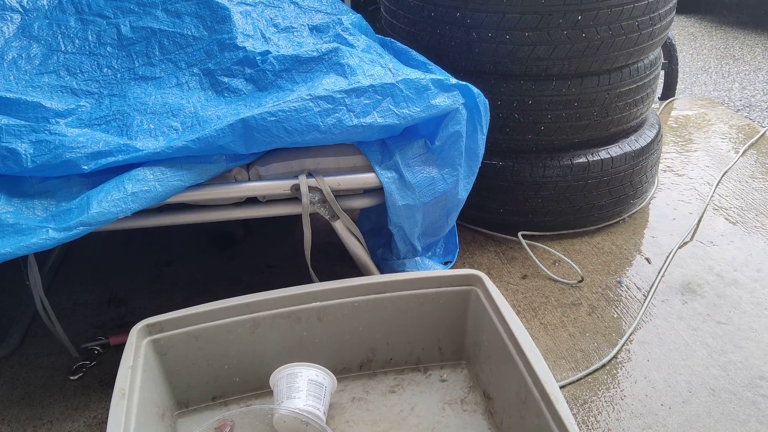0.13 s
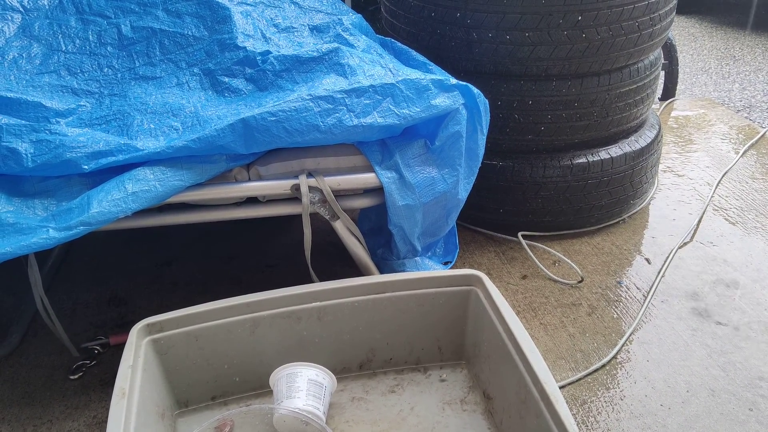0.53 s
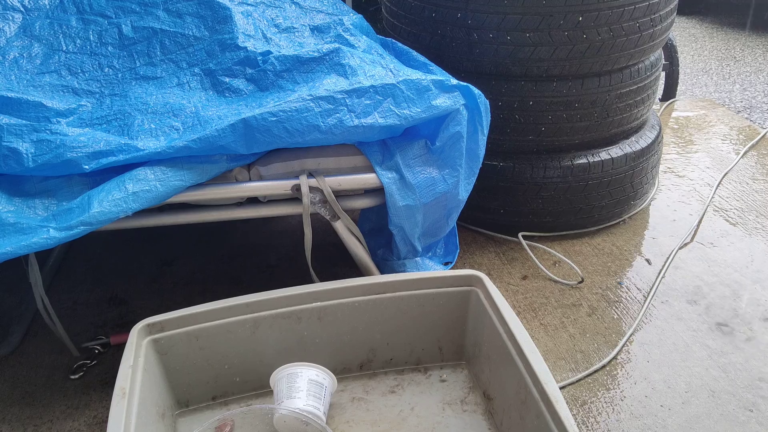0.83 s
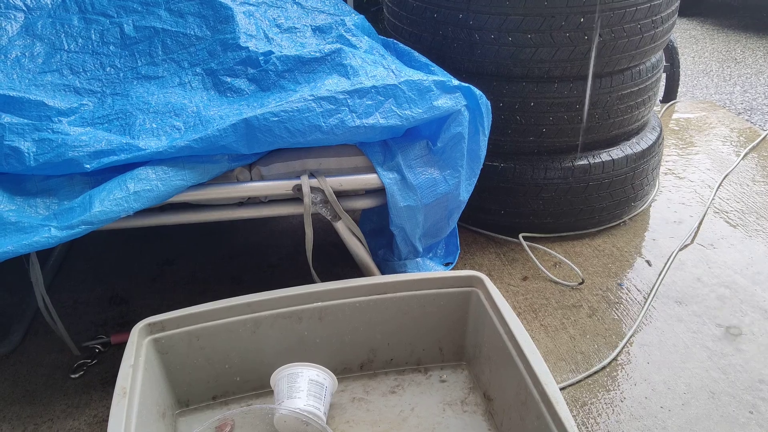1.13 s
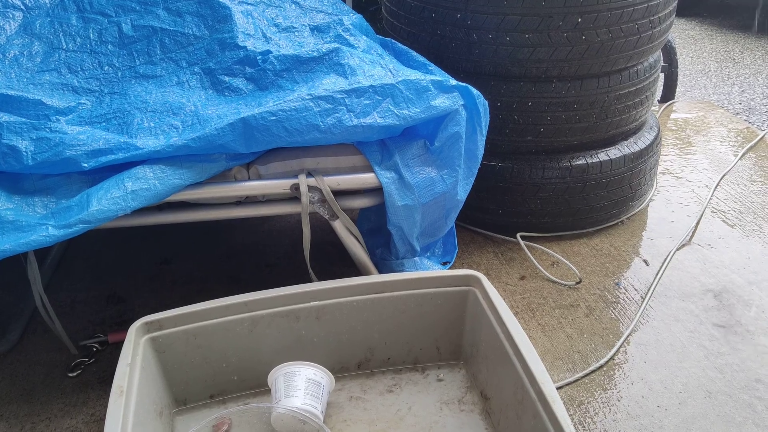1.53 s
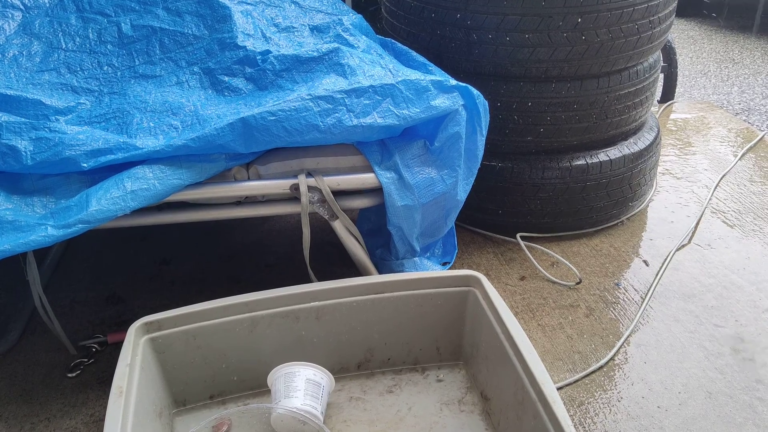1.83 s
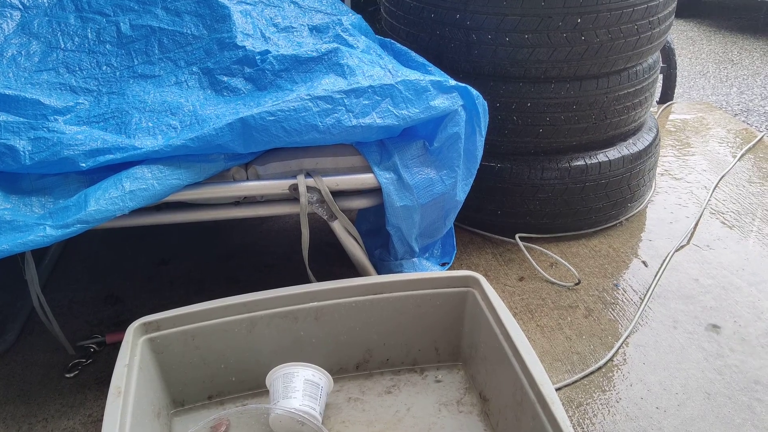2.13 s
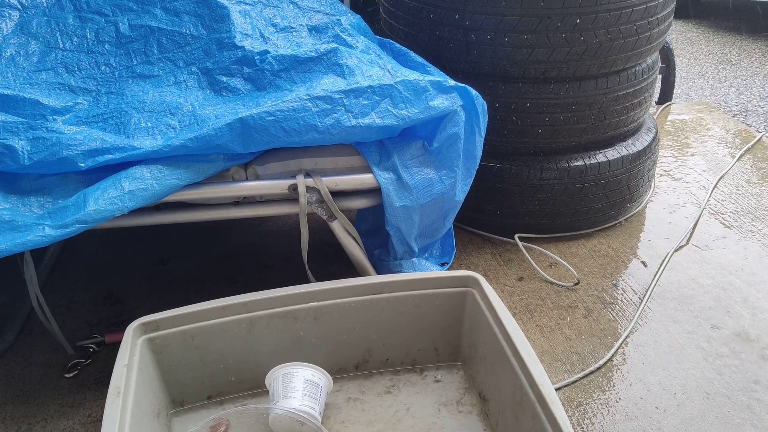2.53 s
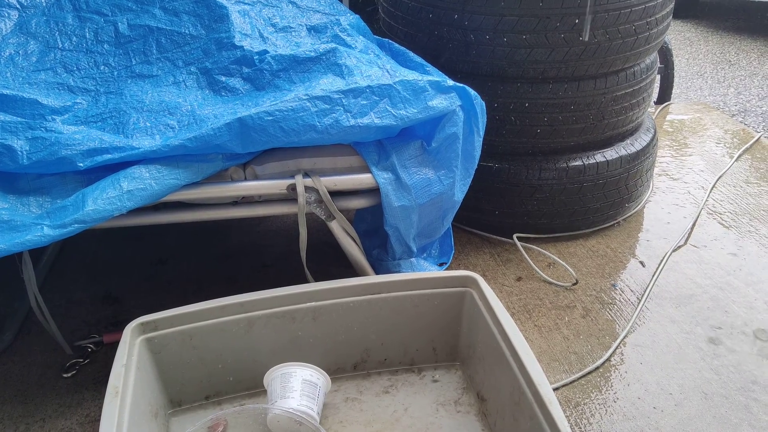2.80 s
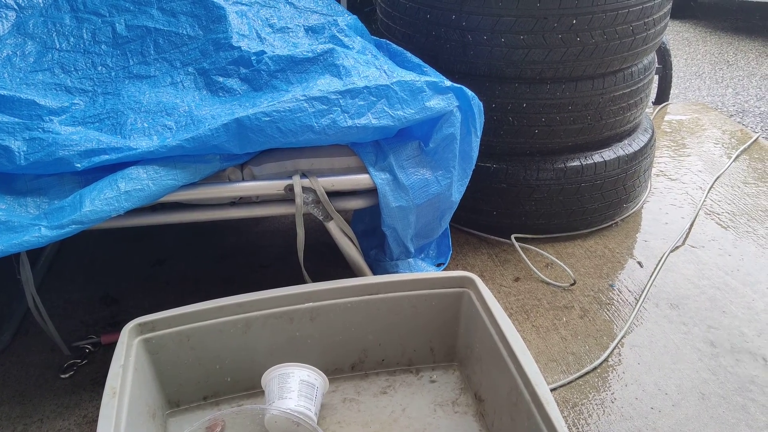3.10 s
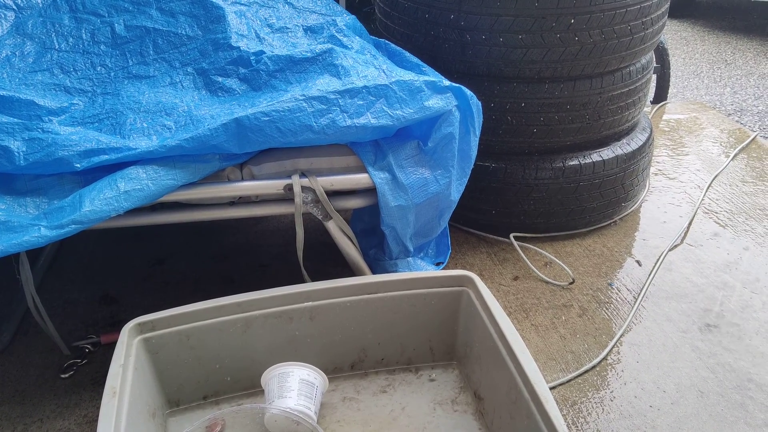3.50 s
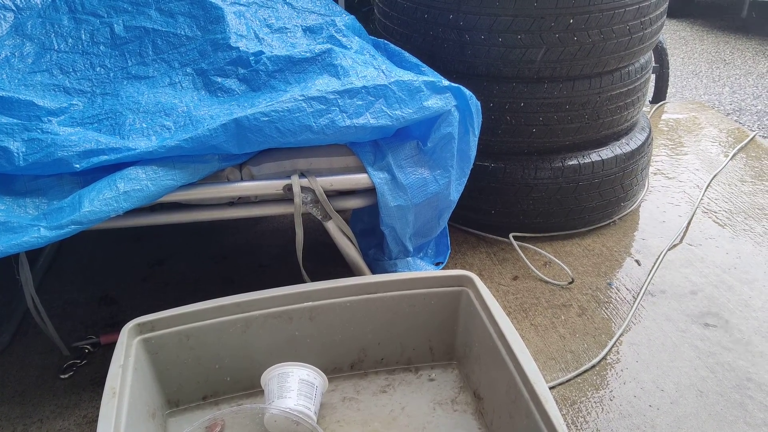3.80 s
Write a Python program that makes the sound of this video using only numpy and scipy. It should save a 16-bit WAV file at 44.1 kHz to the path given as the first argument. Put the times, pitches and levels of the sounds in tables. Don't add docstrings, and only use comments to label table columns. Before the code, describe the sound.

Sharp, dry drips hit a tarp close to a phone outdoors, clustered at first, then around one and a half seconds, and thickest near the end; fine rain, faint scuffs and low engine drone sit underneath.

```python
import sys
import numpy as np
from scipy import signal
from scipy.fft import rfft, irfft
from scipy.io import wavfile
from scipy.ndimage import uniform_filter1d

SR = 44100
rng = np.random.default_rng(int(sys.argv[2]) if len(sys.argv) > 2 else 0)


def materialize(psi):
    bounded = np.clip(np.atleast_2d(psi).T, -1, 1)
    quanta = np.round(bounded * 32767).astype(np.int16)
    wavfile.write(sys.argv[1], SR, quanta)


def natural_amplitude(level_db):
    exponent = np.asarray(level_db, float) / 20
    return 10 ** exponent


N = 174195
T = np.arange(N) / SR

# start in seconds, peak in dB, dull part in dB against the peak,
# scatter in dB, top of the treble in dB against the peak.
HEAVY_DRIPS = [(0.1448, -2.5, -19, -11.5, -28), (0.2996, -25.5, -27, -16.5, -7),
               (0.3902, -8, -31, -12, -43), (0.5243, -21.5, -30, -18, -7.5),
               (0.5578, -6, -37.5, -14.5, -27.5), (0.635, -11, -27, -14.5, -43),
               (1.2898, -19, -26, -10.5, -16), (1.4476, -18, -30, -16.5, -20.5),
               (1.5349, -19.5, -36.5, -15.5, -19), (1.5926, -17, -29.5, -15, -11.5),
               (1.6251, -7.5, -33, -16, -28), (1.7134, -9, -50, -16, -15.5),
               (1.837, -18, -30.5, -15.5, -12), (2.393, -1.5, -22, -13.5, -28.5),
               (2.5746, -13.5, -35.5, -14.5, -10), (2.813, -10.5, -25, -15, -13),
               (2.9953, -20, -21.5, -13.5, -7.5), (3.1203, -19, -27, -11, -8),
               (3.1923, -14, -30.5, -16, -12.5), (3.2722, -21, -35, -16, -6),
               (3.2979, -9.5, -29, -14.5, -35), (3.4121, -10.5, -47, -15, -19.5),
               (3.681, -2.5, -36, -16, -18.5), (3.7398, -5.5, -29, -14, -15.5)]
# start in seconds, peak in dB, scatter in dB.
LIGHT_TAPS = [(0.0, -35, -7), (0.0486, -43.5, -3), (0.1, -44, -22), (0.276, -37, -25), (0.7142, -36, -11),
              (0.784, -25.5, -10), (0.812, -29.5, -7), (0.847, -28.5, -13.5), (0.8754, -34.5, -8.5),
              (0.989, -37, -11), (1.052, -38, -6), (1.1095, -38.5, -4.5), (1.1777, -40.5, 0),
              (1.2128, -30.5, -11), (1.2233, -31, -13), (1.404, -39.5, -1.5), (1.4172, -39.5, -5),
              (1.514, -39, -4.5), (1.914, -37, -20), (2.0827, -41, -17.5), (2.118, -26.5, -14.5),
              (2.173, -33.5, -19), (2.1974, -29.5, -9), (2.2352, -27, -16.5), (2.4393, -27.5, -25),
              (2.5403, -35.5, -31), (2.6403, -36, -5.5), (2.698, -33.5, -20), (2.7794, -28.5, -14.5),
              (2.8813, -32.5, -16.5), (2.9318, -26, -24), (3.5394, -35, -24), (3.59, -36.5, -13),
              (3.639, -35, -2), (3.9053, -43.5, -6)]
# start in seconds, peak in dB, scatter in dB.
SPLASHES = [(0.1615, -11.5, -21), (0.1698, -22, -10.5), (0.2112, -19.5, -15.5), (0.4082, -16.5, -12.5),
            (1.3015, -25.5, -23), (1.466, -32, -33), (1.7325, -20.5, -9), (1.8611, -31, -12),
            (2.4064, -15.5, -19.5), (2.4504, -18, -13), (2.8533, -30, -34), (3.147, -23, -10.5),
            (3.6897, -18.5, -13), (3.7937, -19, -12.5)]
# start in seconds, peak in dB.
TICKS = [(0.1462, -13), (0.15, -16.5), (0.1722, -24.5), (0.1764, -20), (0.1834, -19.5), (0.1963, -21.5),
         (0.207, -25), (0.3924, -26), (0.3946, -30), (0.403, -29), (0.5287, -25), (0.552, -29),
         (0.5605, -18), (0.5654, -22.5), (0.6396, -22.5), (0.6398, -34.5), (0.6518, -34), (0.6531, -30.5),
         (0.7866, -30.5), (1.0191, -38), (1.065, -30), (1.2383, -34), (1.6312, -29.5), (1.634, -25),
         (1.6436, -30), (1.6455, -27), (1.7161, -18), (1.722, -22), (1.7269, -20.5), (1.731, -20.5),
         (1.7477, -21.5), (1.758, -27), (1.8114, -36), (1.8927, -37), (1.9796, -36), (2.4013, -15),
         (2.4144, -22), (2.414, -25), (2.462, -29), (2.5106, -35), (2.513, -33), (2.7425, -34.5),
         (2.9261, -33), (3.02, -30.5), (3.0763, -46), (3.303, -29), (3.4168, -22.5), (3.4698, -28),
         (3.5936, -28.5), (3.6237, -31), (3.6416, -36.5), (3.6587, -33), (3.6713, -28), (3.6865, -18),
         (3.6954, -21), (3.7, -24), (3.7112, -23.5), (3.7529, -20.5), (3.7668, -18.5), (3.7977, -32)]
# frequency in Hz, level in dB.
CRACK_COLOUR = [(3000, -53.5), (4600, -23), (5300, -15), (6000, -4), (6450, -1), (7000, -5.5),
                (7700, -10.5), (8300, -19)]
# frequency in Hz, level in dB.
DULL_COLOUR = [(1500, -27), (2200, -18), (3000, -11), (4000, -3.5), (4900, 2), (5600, -1.5), (7000, -26.5)]
# frequency in Hz, level in dB.
RAIN_COLOUR = [(600, -27), (1100, -17.5), (3100, -13.5), (5000, -8.5), (5700, -11.5), (6300, -1),
               (7000, -10.5), (8200, -12)]
# frequency in Hz, level in dB.
YARD_COLOUR = [(30, -32), (65, -7), (92, -15.5), (125, 0), (200, -2.5), (970, -5), (2500, -14),
               (5500, -54.5)]
# time in seconds, strength in dB.
SHOWER = [(0.0, -50), (0.69, -50), (1.0, -51), (1.16, -53), (1.28, -50.5), (1.385, -54), (1.44, -48.5),
          (1.68, -49), (1.9, -50), (2.03, -50), (2.2, -48.5), (2.461, -53), (2.58, -49.5), (2.76, -46.5),
          (3.18, -48.5), (3.32, -50.5), (3.42, -47.5), (3.95, -51.5)]
# start in seconds, pitch in Hz, level in dB, time to fade by 60 dB in seconds.
PLINKS = [
    (0.278, 1390, -47, 0.041),
    (.752, 1850, -48, 0.042),
    (1.046, 3340, -44, 0.02),
    (1.968, 1990, -49, 0.1),
    (2.934, 2140, -36, 0.023),
    (3.723, 1040, -34, 0.007),
]
SCUFF_TIMES = [3.035, 3.11, 3.922, 1.34, 1.96, 3.03, 3.115, 2.088, 2.722]
# rise in seconds, fall in seconds, low edge in Hz, high edge in Hz, level in dB.
SCUFFS = [
    (0.015, 0.044, 90, 430, -54),
    (0.021, 0.041, 700, 1950, -48),
    (0.015, .022, 3200, 5200, -48.5),
    (.028, 0.024, 1750, 3900, -53.5),
    (0.016, .02, 3000, 3700, -57),
    (0.016, .025, 410, 1940, -55),
    (.022, 0.028, 1800, 5000, -44),
    (0.016, 0.027, 680, 1040, -59),
    (.015, 0.017, 3100, 4200, -57.5),
]
# time in seconds, pitch in Hz, level in dB.
ENGINE = [
    (2.36, 170, -80),
    (2.5, 173.8, -63.5),
    (2.62, 165, -76),
    (2.75, 140, -66),
    (2.95, 138, -66.5),
    (3.2, 140, -67.5),
    (3.699, 145, -63),
    (3.95, 148, -75.5),
]
# start in seconds, length in seconds, pitch in Hz.
WHINE = (3.33, .38, 355)
HOLLOW_TIMES = [3.681, 3.7398]
# centre in Hz, width in Hz, level in dB.
HOLLOWS = [
    (3970, 1200, -39),
    (3590, 1000, -28),
]

SCATTER_T60_S = .17
ONSET_S, TICK_ONSET_S = .0008, .0006


def level(x, db):
    return x * natural_amplitude(db) / np.sqrt(np.mean(x ** 2))


def response(points, skirt_db=-14):
    hz, db = np.array(points).T
    f = np.maximum(np.arange(4097) * SR / 8192, 1)
    gain_db = np.interp(np.log(f), np.log(hz), db) + skirt_db * np.clip(np.log2(hz[0] / f), 0, 6)
    c = irfft(gain_db * np.log(10) / 20)
    c[1:4096] *= 2
    c[4097:] = 0
    return irfft(np.exp(rfft(c)))[:4096]


def through(x, h):
    return signal.fftconvolve(x, h)[:len(x)]


def struck(clicks, colour):
    h = response(colour)
    return through(clicks, h / abs(h).max())


def band(x, hz, width_hz):
    return signal.lfilter(*signal.iirpeak(hz, hz / width_hz, fs=SR), x)


def walk(rate):
    k = int(SR / rate)
    w = np.repeat(rng.standard_normal(N // k + 1), k)
    w = uniform_filter1d(uniform_filter1d(w, k), k)[:N]
    return w / w.std()


def grains(per_s, spread_db, count=N):
    chance, sign, size = rng.random((3, count))
    g = (chance < per_s / SR) * np.sign(sign - .5) * natural_amplitude(-spread_db * np.log(size + 1e-4))
    return g / np.sqrt(np.mean(g ** 2) + 1e-18)


def tone(hz):
    return np.sqrt(2) * np.sin(2 * np.pi * np.cumsum(hz) / SR)


def add(out, at, x):
    i = int(at * SR)
    out[i:i + len(x)] += x[:N - i]


def impact(scatter_db):
    bounce_s, bounce_db, rise_s, diffuse_s = .0015, -7, .0011, .018
    lump_db, lump = 1.0, int(.002 * SR)
    ring_share = .7
    t = np.arange(SR // 3) / SR
    apart = np.exp(-t / diffuse_s)
    x = grains(2500, 1.2, count=len(t)) * np.sqrt(apart)
    x = x + rng.standard_normal(len(t)) * np.sqrt(1 - apart)
    x *= natural_amplitude(lump_db * np.sqrt(lump) * uniform_filter1d(rng.standard_normal(len(t)), lump))
    x *= natural_amplitude(scatter_db - 13 - 60 * t / SCATTER_T60_S)
    x *= 1 - np.exp(-(t / (bounce_s + rise_s)) ** 2)
    vary_delay, vary_level, vary_pitch = rng.standard_normal(3)
    ringing = band(x, 6450 * (1 + .045 * vary_pitch), 2300)
    x = (1 - ring_share) * x + ring_share * ringing
    x[0] += 1
    late = int(bounce_s * (1 + .08 * vary_delay) * SR)
    x[late:] = x[late:] + natural_amplitude(bounce_db + 1.5 * vary_level) * x[:-late]
    return x


def drips():
    bright, dull = np.zeros(N), np.zeros(N)
    peak_db, top_lift_db, dull_lift_db, small_db = 2.5, 11.5, 11.5, 2
    rows = list(HEAVY_DRIPS)
    for table, dull_db in [(SPLASHES, -32), (LIGHT_TAPS, -28.5)]:
        for at, db, scatter_db in table:
            rows.append((at, db + small_db, dull_db, scatter_db - small_db, -top_lift_db))
    for at, db, dull_db, scatter_db, top_db in rows:
        x = impact(scatter_db) * natural_amplitude(db + peak_db)
        top = (natural_amplitude(top_db + top_lift_db) - 1) * band(x, 7410, 1600)
        add(bright, at + ONSET_S, x + top)
        thud = impact(scatter_db) * natural_amplitude(db + peak_db + dull_db + dull_lift_db)
        add(dull, at + ONSET_S, thud)
    return struck(bright, CRACK_COLOUR) + struck(dull, DULL_COLOUR)


def patter():
    t, out = T[:SR // 8], 0
    crack = response(CRACK_COLOUR)
    for hz, db in [(5200, -5), (6250, -3), (7200, -8)]:
        tail = .44 * rng.standard_normal(len(t)) * np.exp(-t / .0062)
        tail[0] = 1
        drops = grains(150, 2) * natural_amplitude(3.2 * walk(17))
        x = through(through(drops, tail), crack)
        out = out + level(band(x, hz, 770), db)
    return level(out, -52.5)


def patchy(x):
    z = signal.stft(x, nperseg=512)[2]
    g = uniform_filter1d(rng.standard_normal(z.shape), 3, axis=0)
    g = uniform_filter1d(g, 5, axis=1)
    return signal.istft(z * natural_amplitude(2.1 * g / g.std()), nperseg=512)[1][:N]


def hiss(colour, db, per_s, swell_db):
    x = through(grains(per_s, 1.4) + rng.standard_normal(N), response(colour))
    f, spec = np.fft.rfftfreq(N, 1 / SR), rfft(x)
    swell, out = walk(3.52), 0
    half_octave = 2 * np.log2(f / 20 + 1e-9)
    for k in range(2, 19):
        share = np.cos(np.pi / 2 * np.clip(half_octave - k, -1, 1)) ** 2
        out = out + irfft(spec * share, N) * natural_amplitude(swell_db * swell + 1.4 * walk(16))
    return level(patchy(out), db)


def rain():
    at, db = np.array(SHOWER).T
    strength = natural_amplitude(np.interp(T, at, db - db.mean()))
    return (patter() + hiss(RAIN_COLOUR, -52, 2000, .74)) * strength


def yard():
    return hiss(YARD_COLOUR, -60, 1500, .66) * natural_amplitude(.5 * (T / T[-1] - .5))


def mains_hum():
    return tone(np.full(N, 2. * 60)) * natural_amplitude(-69.5)


def ticks():
    clicks = np.zeros(N)
    for at, db in TICKS:
        add(clicks, at + TICK_ONSET_S, natural_amplitude(db + 1.5) * np.ones(1))
    return struck(clicks, CRACK_COLOUR)


def plinks():
    out, t = np.zeros(N), T[:SR // 10]
    for at, hz, db, t60 in PLINKS:
        fade = natural_amplitude(db - 60 * t / t60) * (1 - np.exp(-t / .00096))
        add(out, at, fade * np.sin(2 * np.pi * hz * t * (1 + .063 * t / t60)))
    return out


def scuffs():
    out = 0
    for at, (rise, fall, low_hz, high_hz, db) in zip(SCUFF_TIMES, SCUFFS):
        edges = signal.butter(3, [low_hz, high_hz], "bandpass", fs=SR, output="sos")
        grit = level(signal.sosfilt(edges, grains(2500, 1.3)), db) * natural_amplitude(2 * walk(90))
        t = T - at
        before = (t / rise) ** 2
        after = (t / fall) ** 2 / (1 + abs(t) / fall)
        out = out + grit * np.exp(-np.where(t < 0, before, after))
    return out


def engine():
    at, hz, db = np.array(ENGINE).T
    pitch = np.interp(T, at, hz) * (1 + .025 * walk(11))
    return tone(pitch) * natural_amplitude(np.interp(T, at, db, left=-99) + 2.1 * walk(18))


def whine():
    start, length, hz = WHINE
    swell = np.sin(np.pi * np.clip((T - start) / length, 0, 1)) ** .2
    return tone(hz * (1 + .0015 * walk(2.94))) * natural_amplitude(-67 + 2 * walk(14)) * swell


def tub():
    out = np.zeros(N)
    for at, (hz, width_hz, db) in zip(HOLLOW_TIMES, HOLLOWS):
        x = band(band(impact(-7), hz, width_hz), hz, width_hz)
        add(out, at + ONSET_S, x / abs(x).max() * natural_amplitude(db))
    return out


def scene():
    wet = drips() + rain() + yard() + ticks() + plinks() + tub()
    return (wet + mains_hum() + scuffs() + engine() + whine())[None]


def top_cut(x):
    return signal.sosfilt(signal.butter(12, 8510, fs=SR, output="sos"), x)


def record(dry):
    cut = signal.sosfilt(signal.ellip(12, .3, 70, 7940, fs=SR, output="sos"), dry)
    leak = signal.sosfilt(signal.ellip(6, .5, 50, 15000, fs=SR, output="sos"), dry - cut)
    mix = cut + natural_amplitude(-40) * leak
    return top_cut(mix)


dry = scene()
out = record(dry)
materialize(out)
```